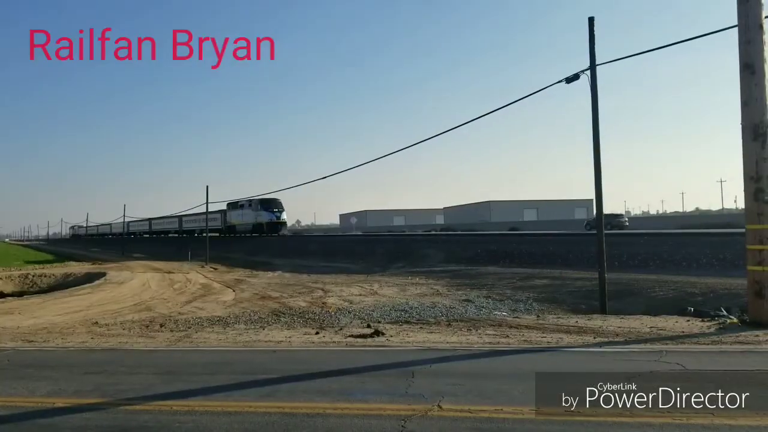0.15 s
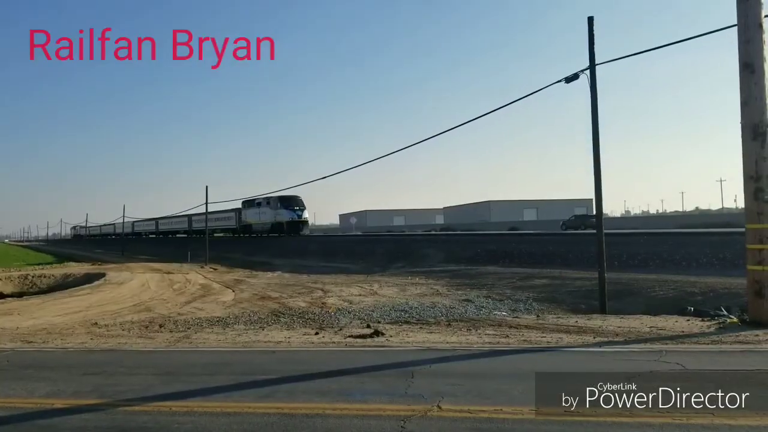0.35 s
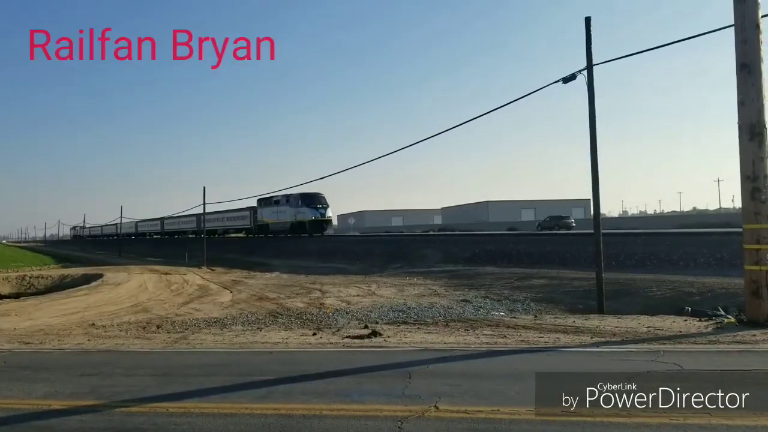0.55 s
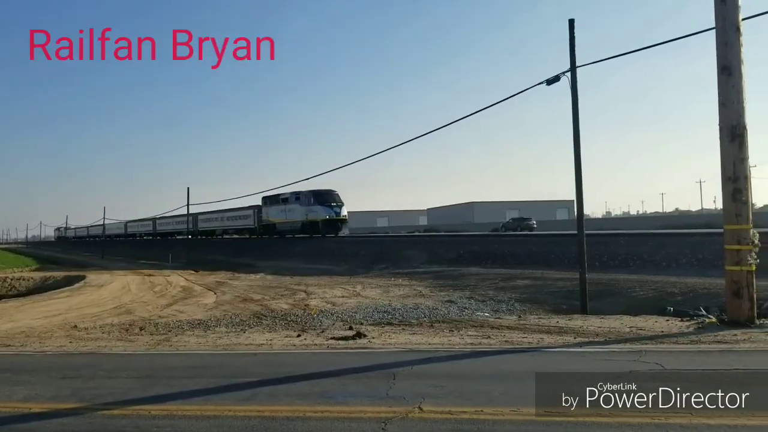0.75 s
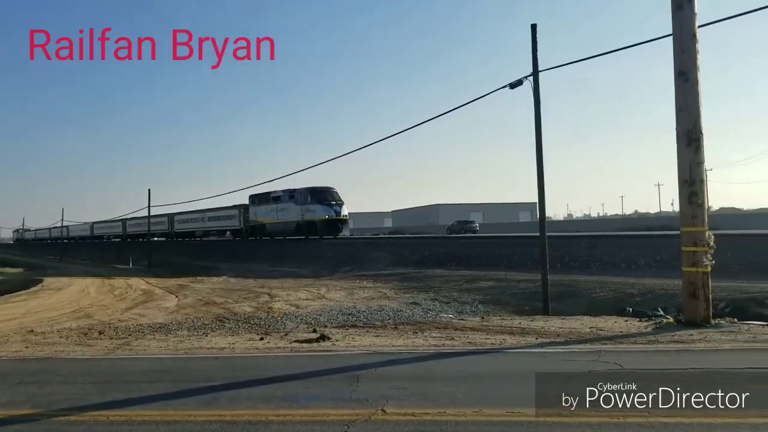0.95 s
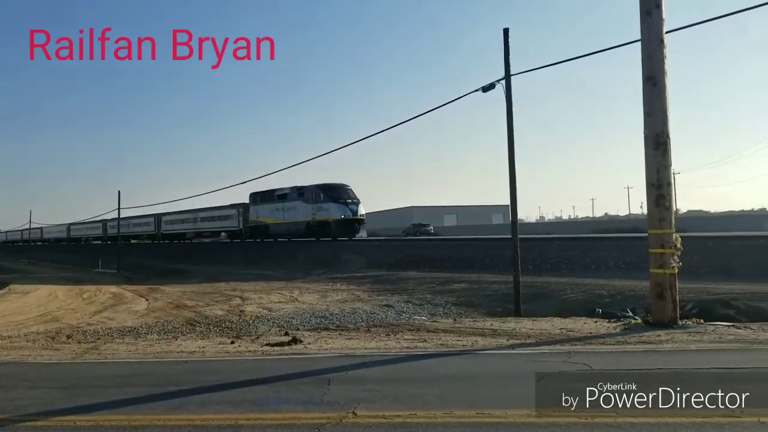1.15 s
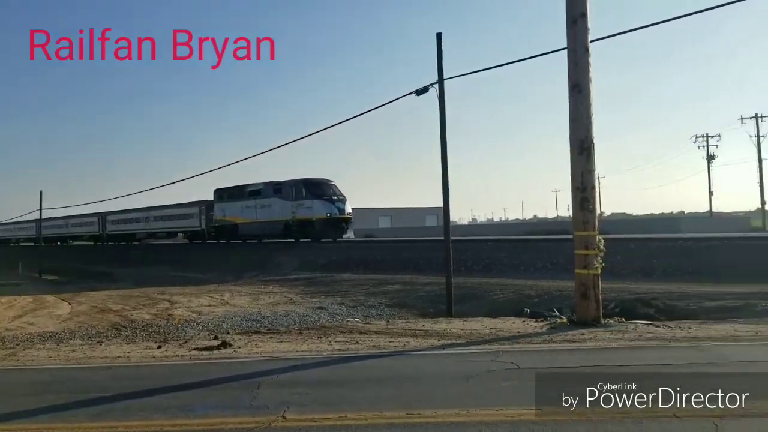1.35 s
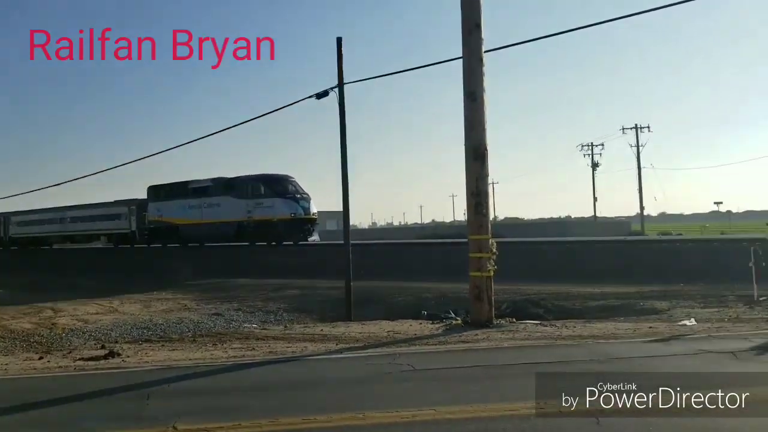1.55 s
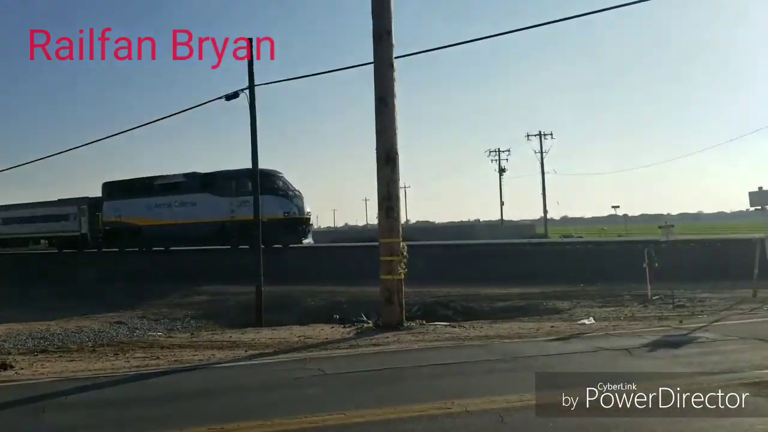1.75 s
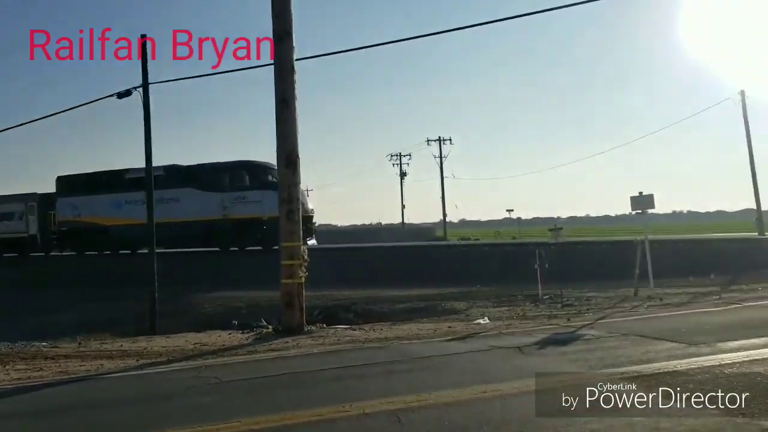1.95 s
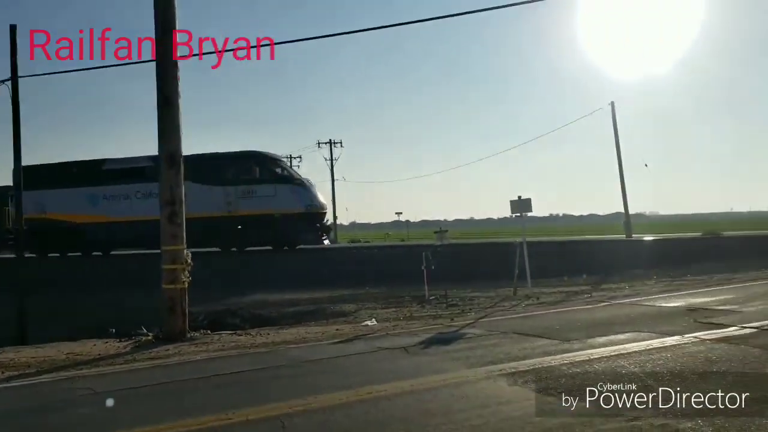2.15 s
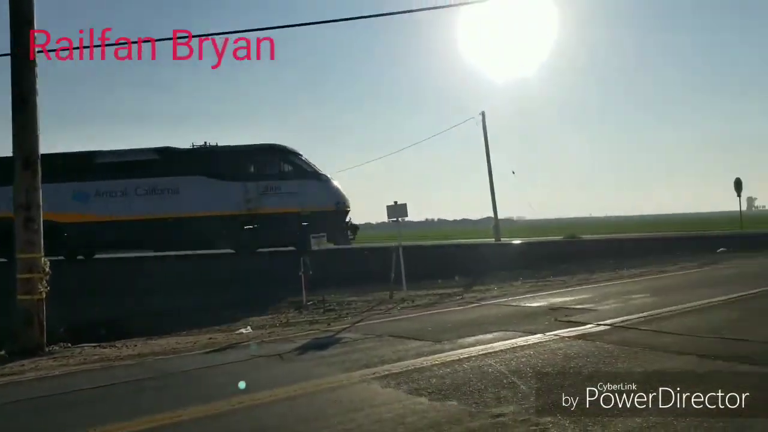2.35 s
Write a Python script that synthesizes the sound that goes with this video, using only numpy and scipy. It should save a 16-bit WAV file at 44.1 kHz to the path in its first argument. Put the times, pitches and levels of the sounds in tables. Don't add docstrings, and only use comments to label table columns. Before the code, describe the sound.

A train air horn blows a brassy five-note chord: short from about 0.8 to 1.1 seconds, then long and shimmering from 2.0 to the end at 2.5, sinking in pitch. Beneath, a low diesel throb runs throughout, with airy wheel roar growing and faint singing metal. Dry finger clicks come near 0.2, 0.55 and 0.77; a faint air hiss at 1.9. Open-air stereo phone sound, slight echo.

```python
import sys
import numpy as np
from scipy import signal
from scipy.fft import rfft, irfft
from scipy.io import wavfile
from scipy.ndimage import uniform_filter1d

SR = 44100
rng = np.random.default_rng(int(sys.argv[2]) if len(sys.argv) > 2 else 0)


def store_pcm(level_fs):
    pcm = np.round(np.clip(level_fs, -1, 1) * 32767).astype(np.int16)
    wavfile.write(sys.argv[1], SR, np.atleast_2d(pcm).T)


def level_to_linear(level):
    exponent = np.asarray(level, float) / 20
    return 10 ** exponent


N = 110250
t = np.arange(N) / SR
f = np.arange(N // 2 + 1) * SR / N + 1

# t/s, firing cycle as heard f/Hz, engine level/dB, roar level/dB
APPROACH = [
    (0, 11.83, -25.5, -36),
    (.5, 12.06, -21.5, -36),
    (1.1, 11.97, -22, -28),
    (1.3, 12.14, -23, -31.5),
    (1.55, 11.8, -23.5, -30),
    (1.7, 11.81, -22.5, -29.5),
    (2.0, 11.78, -24, -25),
    (2.15, 11.68, -31, -24),
    (2.3, 11.47, -31, -27),
    (2.5, 11.26, -34, -23),
]
# multiple of the firing cycle, level/dB
ENGINE_ORDERS = [(5, -27), (6, 2), (7, -2), (8.34, -12), (9, -2), (10, -23), (12, -24.5), (13, -32),
                 (14, -13.5), (15, -6.5), (17, -19.5), (18, -24.5), (21, -25)]
# f/Hz, level/dB per Hz
RUMBLE_COLOUR = [(30, -20), (60, -2), (110, 4.5), (220, -1), (330, -15), (430, -29), (700, -19),
                 (1200, -54)]
# f/Hz, level/dB per Hz
ROAR_COLOUR = [(300, -8.5), (500, -3), (1050, -3.5), (1700, 2), (2400, -7), (4000, -5), (6000, -10),
               (14000, -26.5)]
# f/Hz, width/Hz, level far off/dB, at second blast/dB, at the end/dB, wander share
SINGING_BANDS = [(337.6, 139, -48, -31.5, -43, 0.047), (695.6, 280, -53, -34, -48, .02),
                 (996, 380, -48, -41, -51, .01), (1605, 93, -40, -43.5, -70, 0.0058),
                 (2386, 180, -53.5, -39.5, -39.5, 0.024), (3000, 77, -50.5, -49, -65, 0.015),
                 (11080, 2000, -53, -41, -36, 0.025), (12700, 1000, -43, -56, -54, .011)]
# t/s, level/dB, f/Hz, left over right/dB
FINGER_TICKS = [(.198, -26, 5000, 10), (.199, -30, 9500, 6), (.202, -31, 5000, 10), (.19, -40, 9000, 10),
                (.562, -43, 11000, 0), (.772, -35, 13500, -6), (.771, -41, 10000, 2), (.197, -42, 13500, 0)]
# pitch f/Hz, share of the low bell's swing, level of partials 1 to 4/dB
UPPER_BELLS = [
    (447.6, 0.1096, -1, 5, -13.5, 16.5),
    (491.6, .5, -1, -8, -13, -9),
    (559, 0.144, -1, -19, -12.5, -8.5),
]
# t/s, twice low bell's f/Hz, level of low, second, third, fourth, octave bell/dB
SHORT_BLAST = [
    (0.77, 720, -54, -57, -72, -58, -51.5),
    (0.798, 744.5, -27.5, -45, -30, -27, -30),
    (0.826, 767, -30, -30.5, -23, -36, -38.5),
    (0.858, 752.7, -25.5, -49, -49, -17, -13),
    (0.886, 736, -23.5, -35.5, -25.5, -23.5, -17.5),
    (1.006, 718.6, -26, -38.5, -35.5, -21.5, -17.5),
    (1.038, 709.6, -23, -44, -43, -23.5, -18),
    (1.08, 730, -31, -47, -27, -28, -35),
    (1.12, 724, -45.5, -55, -53, -50, -31.5),
]
# t/s, level/dB
SHORT_EDGE = [(0.78, -63), (0.798, -36.5), (0.922, -31), (0.958, -31), (0.974, -31.5), (1.1, -43)]
# t/s, level/dB
SHORT_TOP = [(0.788, -62), (0.838, -43), (.88, -46), (.94, -37.5), (.99, -38), (1.04, -42.5), (1.098, -67)]
# t/s, fourth bell's partial 3/dB, second bell's partial 4/dB, low bell's partial 6/dB
SHORT_FLARE = [(.79, -56, -44, -52), (.826, -47, -37, -50), (.84, -24.5, -46, -42.5), (.896, -25, -50, -44),
               (.92, -27, -45, -45), (.934, -46, -45, -44), (.96, -28.5, -35, -42), (1.0, -34, -34.5, -51),
               (1.07, -43, -50, -54)]
# t/s, twice low bell's f/Hz, level of low, second, third, fourth, octave bell/dB
LONG_BLAST = [
    (2.005, 745.8, -44, -55, -39, -28, -42),
    (2.01, 742.3, -25, -30, -32, -25.5, -20.5),
    (2.072, 723.7, -33.5, -35.5, -23.5, -25.5, -15.5),
    (2.122, 718.4, -25.5, -34.5, -24.5, -30.5, -32.5),
    (2.208, 701.3, -32, -34, -30.5, -50, -20),
    (2.276, 707.1, -37, -44, -32, -28.5, -13.5),
    (2.396, 683.9, -47, -32.5, -24.5, -35, -23.5),
    (2.46, 699, -31.5, -39.5, -29, -40, -33.5),
    (2.5, 694.6, -35.5, -37, -25, -36, -25.5),
]
# t/s, level/dB
LONG_EDGE = [(2.002, -26), (2.012, -28), (2.105, -21.5), (2.155, -18), (2.181, -28.5), (2.279, -37),
             (2.395, -27.5), (2.5, -32)]
# t/s, level/dB
LONG_TOP = [(2.006, -51), (2.012, -29), (2.046, -31.5), (2.065, -38.5), (2.19, -28), (2.203, -38.5),
            (2.228, -26), (2.262, -40), (2.298, -28), (2.335, -34), (2.35, -30.5), (2.376, -37),
            (2.418, -26), (2.5, -39)]
# t/s, fourth bell's partial 3/dB, second bell's partial 4/dB, low bell's partial 6/dB
LONG_FLARE = [(2.006, -49, -48, -43), (2.012, -40, -30, -36.5), (2.06, -34, -44.5, -38.5),
              (2.15, -40, -33, -33.5), (2.2, -36, -35, -42), (2.232, -38, -34, -30.5),
              (2.275, -43, -39, -58), (2.37, -33, -31, -41), (2.5, -48, -33, -48)]
# f/Hz, level/dB
MIC_COLOUR = [(1200, 1.5), (1800, 4), (4800, -2), (5550, 10), (6100, -2.5), (7300, -11.5), (8300, -26),
              (9700, -3), (11300, -28), (14000, -40.5)]
# f/Hz, phase/radians
PORT_LEAD = [(0, 0), (200, .18), (700, 1.1), (1150, 1.7), (1380, 3.1), (1890, 3.0), (2240, 6.0), (2900, 12),
             (14000, 50)]
# f/Hz, shared power
PORT_LIKENESS = [(200, 1), (1200, .95), (1900, .9), (2500, .55), (4000, .4), (6000, .3), (9000, .1)]
# f/Hz, left over right/dB
PORT_TILT = [(100, 2), (370, 1), (700, 4), (1250, 1), (1700, 9.5), (2070, 1.5), (2600, 6.5), (4500, 9),
             (5500, 16), (6800, 11), (9500, 24), (12000, -16)]

CYCLE_HZ, START_TURNS = 11.97, -.2675
RUMBLE_DB = -6
LOW_BELL_HZ, TOP_DB, TOP_SLOPE_DB = 364.3, -9, -0.5071
CEILING = .8


def through_time(rows, column, before=None, after=None):
    r = np.array(rows, float)
    return np.interp(t, r[:, 0], r[:, column], before, after)


def over_hz(rows):
    r = np.array(rows, float)
    return np.interp(np.log(f), np.log(r[:, 0] + 1), r[:, 1])


def walk(rate_hz):
    hold = int(SR / rate_hz)
    stairs = np.repeat(rng.standard_normal(N // 500), hold)[:N]
    return 1.206 * uniform_filter1d(uniform_filter1d(stairs, hold), hold)


def ports(near, stray):
    like = over_hz(PORT_LIKENESS)
    lead = np.interp(f, *np.array(PORT_LEAD).T)
    shared = np.sqrt(like) * rfft(near) * np.exp(-1j * lead)
    unshared = np.sqrt(1 - like) * rfft(stray)
    right = irfft((shared + unshared) * level_to_linear(-over_hz(PORT_TILT)), N)
    return np.array([near, right])


def noise(colour, flicker_db):
    spectrum = rfft(rng.standard_normal(N)) * level_to_linear(over_hz(colour))
    out = 0
    for octave in np.arange(4.5, 14.2, .5):
        window = np.clip(1 - abs(np.log2(f) - octave) / .5, 0, 1)
        out = out + irfft(spectrum * window, N) * level_to_linear(flicker_db * walk(12.23))
    return out / out.std()


def engine():
    turns = 2 * np.pi * (np.cumsum(through_time(APPROACH, 1)) / SR + START_TURNS)
    lines = sum(level_to_linear(db + 1.9 * walk(5.64)) * np.sin(order * turns) for order, db in ENGINE_ORDERS)
    level = level_to_linear(through_time(APPROACH, 2))
    near = level * (lines + level_to_linear(RUMBLE_DB) * noise(RUMBLE_COLOUR, 1.85))
    stray = level * level_to_linear(RUMBLE_DB) * noise(RUMBLE_COLOUR, 2)
    return ports(near, stray)


def roar():
    gate = level_to_linear(through_time(APPROACH, 3) + 1.0 * walk(5.4))
    whine_db = -49 - 9 * t + 8.9 * walk(16.4)
    whine = level_to_linear(whine_db) * np.sin(2 * np.pi * 2695 * t)
    return ports(gate * noise(ROAR_COLOUR, 3.1) + whine, gate * noise(ROAR_COLOUR, 2.3))


def panels():
    out = np.zeros((2, N))
    for hz, width_hz, far_db, blast_db, end_db, wander in SINGING_BANDS:
        pitch = hz * through_time(APPROACH, 1) / CYCLE_HZ * (1 + wander * walk(5.7))
        turns = 2 * np.pi * np.cumsum(pitch) / SR
        gate = level_to_linear(np.interp(t, [0, 1.95, 2.5], [far_db, blast_db, end_db]) + 2.43 * walk(15))
        for side in out:
            slow = irfft(rfft(rng.standard_normal((2, N))) * np.exp(-(2 * f / width_hz) ** 2), N)
            side += gate * (slow[0] * np.cos(turns) + slow[1] * np.sin(turns)) / slow.std()
    return ports(*out)


def ticks():
    out = np.zeros((2, N))
    for start, db, hz, pan_db in FINGER_TICKS:
        burst = rng.standard_normal(N) * np.exp(-np.clip(t - start, 0, 1) / 0.0013) * (t >= start)
        burst = irfft(rfft(burst) * np.exp(-(np.log(f / hz) / 0.17) ** 2), N)
        out += level_to_linear(db) * burst / abs(burst).max() * level_to_linear(np.array([[0], [-pan_db]]))
    return out


def blast(rows, edge, brass, flare, mid_db, third_db, wobble):
    span = slice(int(rows[0][0] * SR) - 300, int(rows[-1][0] * SR) + 300)

    def level(table, column):
        return (through_time(table, column, -99, -99) + 3)[span]

    doppler = (through_time(APPROACH, 1) / CYCLE_HZ)[span]
    low = through_time(rows, 1)[span] / 2
    swing = low / doppler / LOW_BELL_HZ - 1
    top = level(brass, 1) + TOP_DB
    third = level(edge, 1)
    middle = (third + top) / 2 + mid_db
    low_dbs = [level(rows, 2), level(rows, 6), third, middle - 10, middle - 9, level(flare, 3)]
    stacks = [(low, low_dbs, 0)]
    for k, (hz, share, db1, db2, db3, db4) in enumerate(UPPER_BELLS):
        own = level(rows, 3 + k)
        middle = (own + top) / 2
        dbs = [own + db1, own + db2, middle + db3 + third_db, middle + db4]
        stacks.append((hz * doppler * (1 + share * swing), dbs, -5))
    stacks[3][1][2] = level(flare, 1)
    stacks[1][1][3] = level(flare, 2)

    out = np.zeros((2, N))
    for hz, dbs, top_db in stacks:
        pitch = uniform_filter1d(hz, size=600) * (1 + wobble * walk(60)[span])
        turns = 2 * np.pi * np.cumsum(pitch) / SR
        for k in range(1, int(11000 / hz.max())):
            if k <= len(dbs):
                db = dbs[k - 1]
            else:
                db = top + top_db + TOP_SLOPE_DB * (k - len(dbs))
            gain = uniform_filter1d(level_to_linear(db), size=90)
            fade_db = 7 * np.clip(k - 2, .8, 5) / 5
            for side in out:
                fade = level_to_linear(fade_db * walk(45)[span])
                side[span] += gain * fade * np.sin(k * turns + 2.5 * rng.random())
    return out


def horn():
    short = blast(SHORT_BLAST, SHORT_EDGE, SHORT_TOP, SHORT_FLARE, mid_db=0, third_db=21.2, wobble=0.01106)
    long = blast(LONG_BLAST, LONG_EDGE, LONG_TOP, LONG_FLARE, mid_db=11.5, third_db=5.5, wobble=0.00394)
    near, stray = short + long
    tail = rng.standard_normal((2, N)) * level_to_linear(-60 * t / .3) * (t > .02)
    tail *= level_to_linear(-14) / np.sqrt((tail[0] ** 2).sum())
    near = near + signal.fftconvolve(near, tail[0])[:N]
    stray = stray + signal.fftconvolve(stray, tail[1])[:N]
    return ports(near, stray)


def hiss():
    air = irfft(rfft(rng.standard_normal((2, N))) * np.exp(-(np.log(f / 11300) / 0.25) ** 2), N)
    puff = np.exp(-((t - 1.885) / .045) ** 2)
    return level_to_linear(-53) * air / air.std() * puff * level_to_linear(np.array([[0], [-3]]))


def scene():
    locomotive = engine() + roar() + panels() + horn()
    return irfft(rfft(locomotive) * level_to_linear(over_hz(MIC_COLOUR)), N) + ticks() + hiss()


def top_cut(x):
    return signal.sosfilt(signal.butter(12, 14470, fs=SR, output="sos"), x)


def record(dry):
    mix = CEILING * np.tanh(dry / CEILING)
    return top_cut(mix)


dry = scene()
out = record(dry)
store_pcm(out)
```